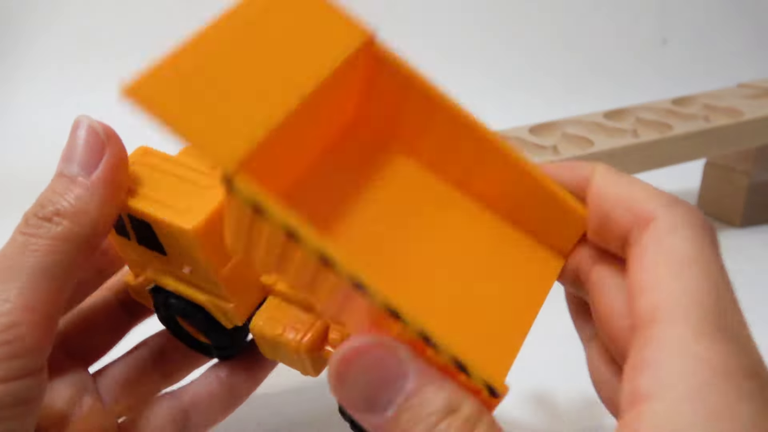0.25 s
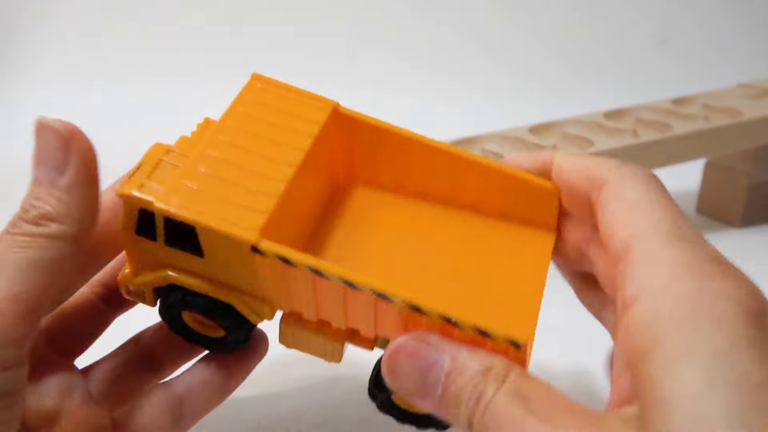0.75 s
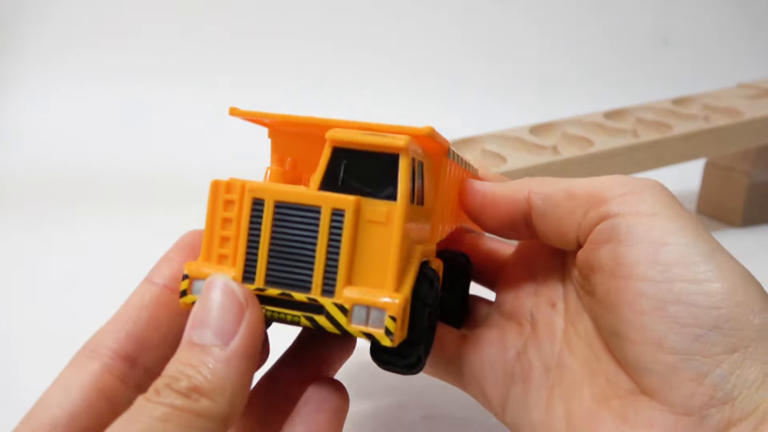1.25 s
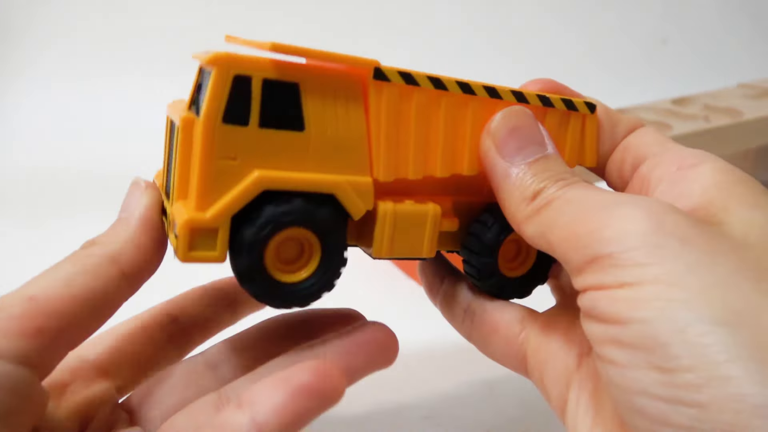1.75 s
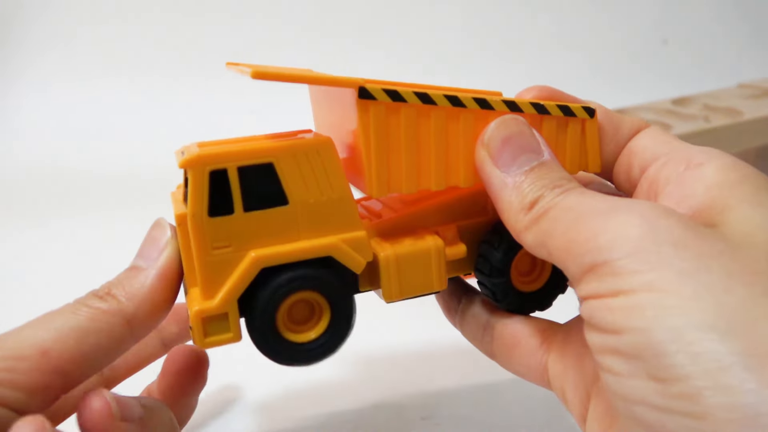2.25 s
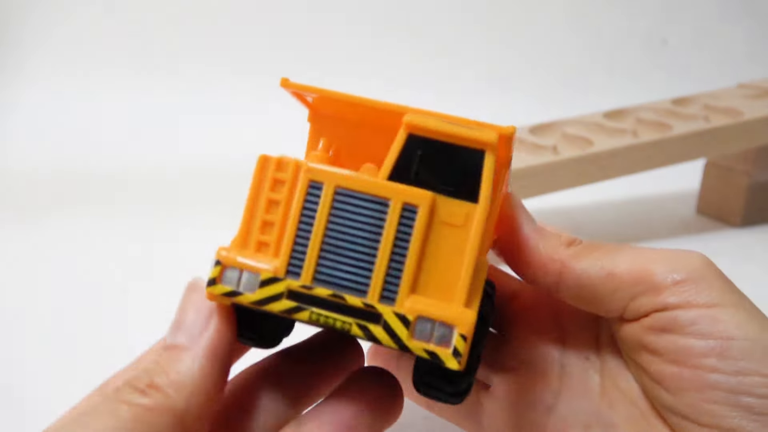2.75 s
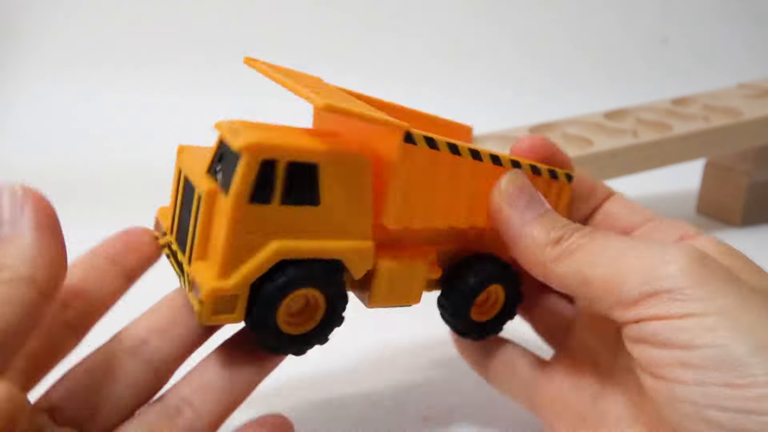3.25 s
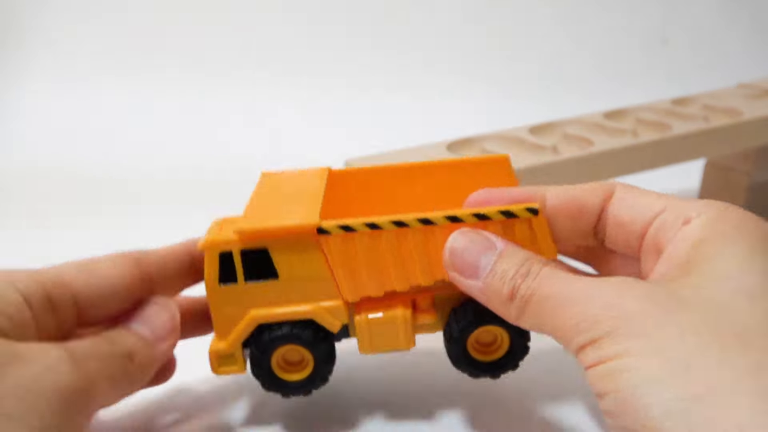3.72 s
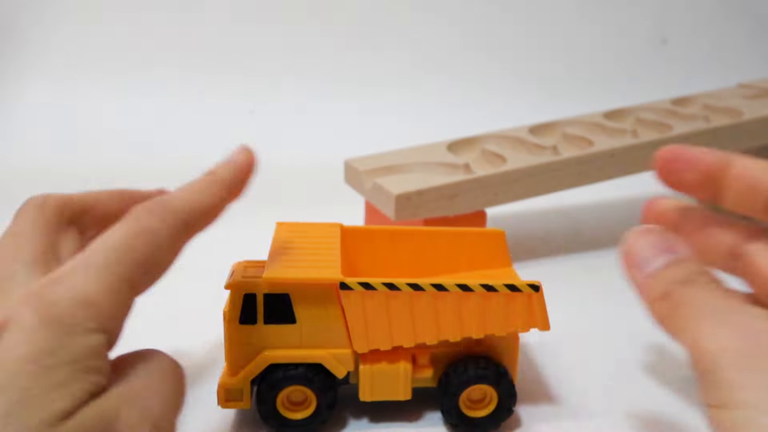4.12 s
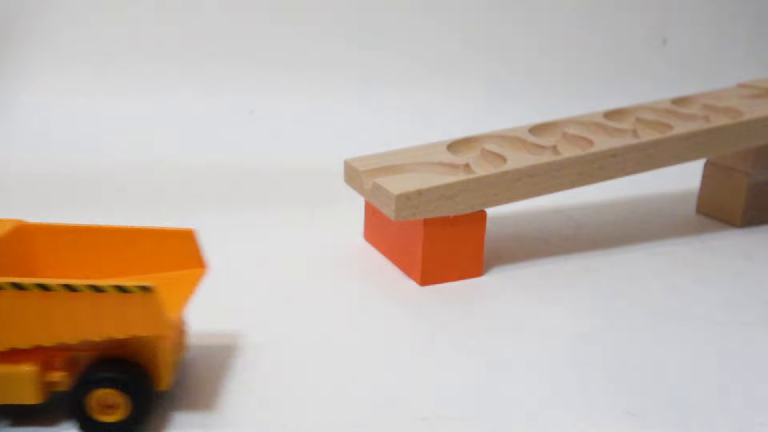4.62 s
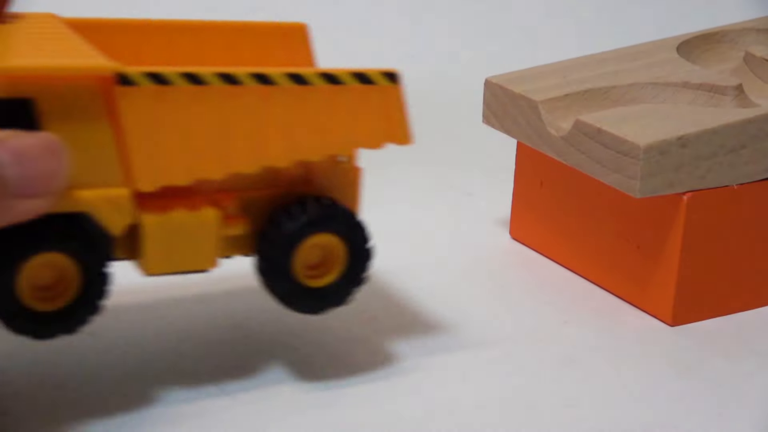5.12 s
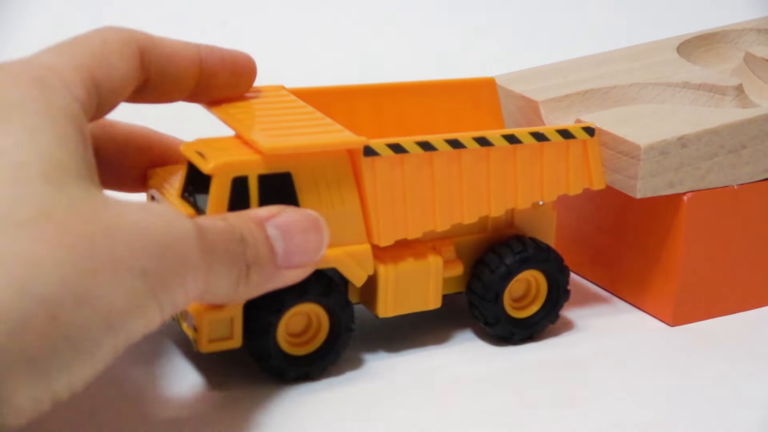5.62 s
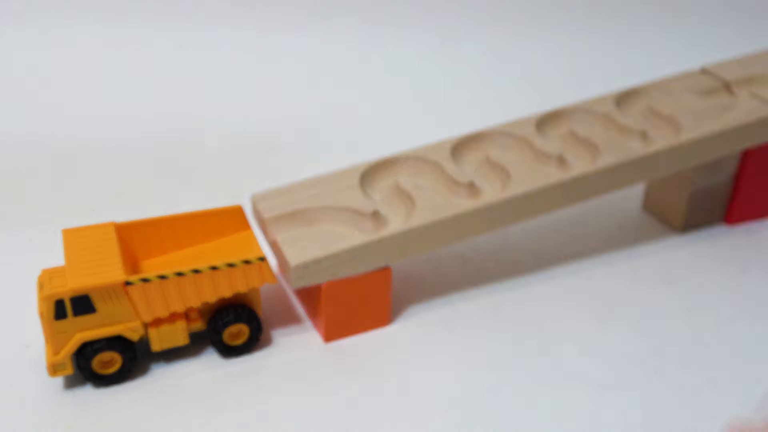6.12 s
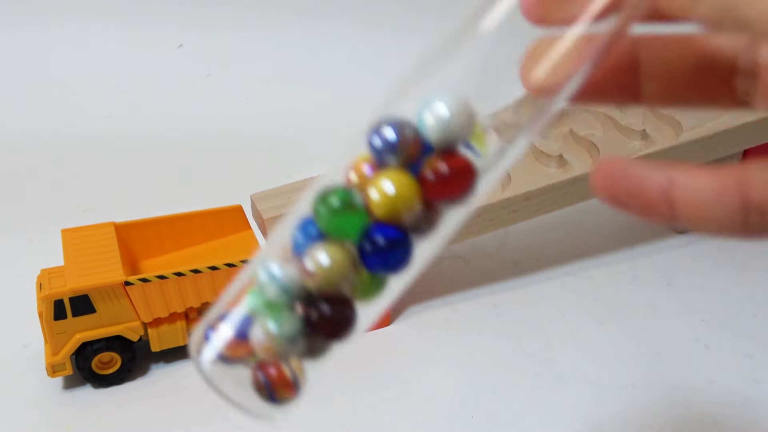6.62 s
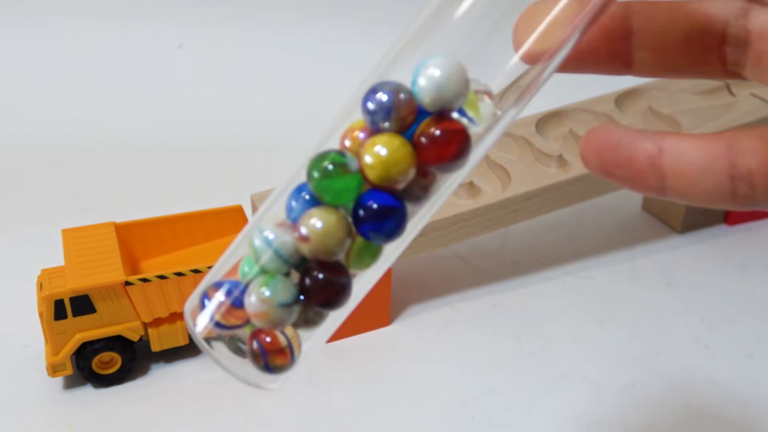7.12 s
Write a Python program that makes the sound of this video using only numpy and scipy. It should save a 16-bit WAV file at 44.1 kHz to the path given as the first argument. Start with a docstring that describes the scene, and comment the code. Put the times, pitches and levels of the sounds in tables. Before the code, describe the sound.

Close up in a small quiet room, hands handle a hollow plastic toy dump truck. Its tipping bed slams twice early amid loose clicks; a flicked wheel rattles briefly, more sharp clicks follow, then a third slam. The truck is set down with a thump, pushed with a drumming rattle, and parked with light knocks. Faint skin rubbing and low hum remain.

```python
"""A faint rub of skin, a click and a slam: hands turn over a hollow plastic toy dump truck in a small room.
Loose parts click and the tipping bed slams shut three times, each blow ringing the modes of the shell.
A flicked wheel knocks on its axle; then the truck is set down and pushed along on drumming ribbed tyres.
It is parked against a wooden ramp. Skin hisses and squeaks on top; steady air noise and a hum lie below."""
import sys
import numpy as np
from scipy import signal
from scipy.fft import rfft, irfft
from scipy.io import wavfile
from scipy.ndimage import uniform_filter1d, minimum_filter1d

SR = 44100
rng = np.random.default_rng(int(sys.argv[2]) if len(sys.argv) > 2 else 0)


def bounce(signal):
    """Save signal as a 16-bit WAV file at the path given by the first command-line argument."""
    frames = np.transpose(np.atleast_2d(signal))
    limited = np.clip(frames, -1, 1)
    pcm = np.round(limited * 32767).astype(np.int16)
    wavfile.write(sys.argv[1], SR, pcm)


N = 325017
TIME = np.arange(N) / SR
RING = TIME[:8192]  # time axis of a single blow


def amp(db):
    """Turns decibels into gain."""
    return 10 ** (np.asarray(db) / 20)


def evened(x):
    """Scales to an rms of 1."""
    return x / np.sqrt(np.mean(x ** 2) + 1e-20)


def decay(t, t60):
    """Exponential fade by 60 dB in t60 seconds."""
    return np.exp(-np.log(1000) * t / t60)


def read(points, hz):
    """Reads a curve of (Hz, value) points on a log-frequency axis."""
    f, value = np.transpose(points)
    return np.interp(np.log(hz + 1), np.log(f + 1), value)


def add(mix, s, sound):
    """Adds a sound to the mix at time s."""
    part = mix[..., max(round(s * SR), 0):][..., :sound.shape[-1]]
    part += sound[..., :part.shape[-1]]


def panned(x, left_db):
    """Spreads a sound over both channels, the left one louder by left_db."""
    return x * amp([[left_db / 2], [-left_db / 2]])


def colour(x, points, size=4096):
    """Causal minimum-phase filter with the given spectrum of (Hz, dB) points."""
    log_gain = np.log(amp(read(points, abs(np.fft.fftfreq(size, 1 / SR)))))
    taps = np.fft.ifft(np.exp(np.conj(signal.hilbert(log_gain)))).real[:size // 2]
    return signal.fftconvolve(x, taps)[:len(x)]


def wander(per_s):
    """Smooth random drift of rms 1; a higher per_s drifts faster."""
    low_pass = np.exp(-(np.fft.rfftfreq(N, 1 / SR) / per_s) ** 2)
    return evened(irfft(rfft(rng.standard_normal(N)) * low_pass, N))


def ringing(modes, weights):
    """Sum of dying modes; the weights depend on where the blow lands."""
    hz, db, t60 = np.transpose(modes)[:, :, None]
    return weights @ (amp(db) * decay(RING, t60) * np.sin(2 * np.pi * hz * RING))


def grains(per_s, spread_db):
    """Random tiny impacts, a few of them large."""
    chance = rng.random(N)
    size = np.minimum(rng.exponential(1, N), 3)
    sign = rng.choice([-1, 1], N)
    return (chance < per_s / SR) * amp(spread_db * size) * sign


# Diffuse sound in the two channels. Each row: frequency in Hz, left-right likeness from 0 to 1.
LIKENESS = [(100, 0.7), (1000, 0.89), (3000, 0.97), (7000, .6), (15000, 0.41)]


def diffuse(pair):
    """Makes two unrelated signals as alike as two close microphones hear them."""
    same = np.clip(read(LIKENESS, np.fft.rfftfreq(pair.shape[1], 1 / SR)), 0, .999)
    mid, side = rfft(pair) * np.sqrt([(1 + same) / 2, (1 - same) / 2])
    return irfft([mid + side, mid - side], pair.shape[1])


# Modes of the hollow shell. Each row: frequency in Hz, level in dB, t60 in seconds.
SHELL_MODES = [(199, 0, 0.074), (311, -10, 0.2), (1004, 0, 0.079), (1096, -8, 0.041), (1331, 4.5, 0.066),
               (1660, -11.5, 0.023), (1750, -1.5, 0.057), (2274, -8, 0.033), (2652, -3, 0.066),
               (2950, -2, 0.057), (3440, 1, 0.05), (3678, -0.5, 0.074), (3930, 7.5, 0.018),
               (4776, -7, 0.16), (5255, 7, 0.034), (7200, 5.5, 0.047)]
# Colour of a blow on the plastic. Each row: frequency in Hz, level in dB.
PLASTIC_COLOUR = [(60, -36.5), (250, -30), (500, -16.5), (750, -10), (1050, 1), (1450, 0), (2000, 2.5),
                  (2900, 3.5), (4200, -0.5), (6000, -4.5), (8500, -8.5), (12000, -18.5), (16000, -24.5)]
# Where the truck is. Each row: time in seconds, left over right in dB.
PLACE = [(3.45, -1.8), (3.96, 1), (4.3, -3.5), (4.75, 3.5), (5.1, 4.5), (5.5, 0.5)]
# Harder blows crack more briefly: a medium blow has MEDIUM_DB, and HALVING_DB above it the crack is halved
MEDIUM_DB, HALVING_DB = -30, 22


def blows(rows, crack_s, ring_db, part_db, bounce_db, bounce_s, rise_s, uneven_db=4.0, count=3, size=441):
    """Each blow chatters: a crack of crowded modes, the shell, and the brief ring of the struck part."""
    out = np.zeros((2, N))
    for s, db, body_db, treble_db, part_hz in rows:
        # first contact and its bounces
        crack_t60 = crack_s * 2 ** ((MEDIUM_DB - db) / HALVING_DB)
        delays = np.append(0, np.cumsum(bounce_s * rng.uniform(.5, 1.5, count)))
        age = np.maximum(RING - delays[:, None], 0)
        contacts = decay(age, crack_t60) * (1 - np.exp(-age / rise_s))
        contact_db = bounce_db * np.arange(len(age)) + uneven_db * np.append(0, rng.standard_normal(count))
        crack = rng.standard_normal(len(RING)) * np.sqrt(amp(contact_db) ** 2 @ contacts ** 2)

        signs = rng.choice([-1, 1], len(SHELL_MODES))
        shell = ringing(SHELL_MODES, signs * rng.uniform(0.69, 1.1, len(SHELL_MODES)))
        hit = colour(evened(crack) + amp(ring_db) * evened(shell), PLASTIC_COLOUR)
        tilt = [(250, 0), (700, body_db), (1100, body_db), (1700, 0), (3600, 0), (6000, treble_db)]
        hit = colour(hit, tilt)

        # fingers damp the struck part, so its close modes die within a few tens of milliseconds
        part_modes = [(part_hz * .87, -3, .02), (part_hz, 0, .026), (part_hz * 1.14, -3, .02)]
        part = ringing(part_modes, rng.choice([-1, 1], 3))
        part = colour(part, [(120, -16.5), (600, -2.5)])  # small parts radiate little bass

        # hit and part are balanced over their first samples
        hit = amp(db) * (hit / np.std(hit[:size]) + amp(part_db) * part / np.std(part[:size]))
        add(out, s, panned(hit, np.interp(s, *np.transpose(PLACE))))
    return out


def faint_ticks(rows, lead_s=0.01, softer_db=-23, duller_db=-9):
    """A faint, dull tick comes about 10 ms before each hard blow."""
    leads = lead_s * rng.uniform(.6, 1.4, len(rows))
    return [(s - lead, db + softer_db, body_db, treble_db + duller_db, hz)
            for (s, db, body_db, treble_db, hz), lead in zip(rows, leads) if db > MEDIUM_DB]


# The tipping bed drops on the chassis. Each row: start in seconds, level in dB,
# extra body in dB, extra treble in dB, pitch of the struck part in Hz.
SLAMS = [(0.1017, -7.5, -3.5, -1, 1207), (0.7201, -6.5, -4.5, 0.21, 1750), (3.4183, -9, 3, 0.5, 2650)]


def bed_slams():
    """The bed hits with a steep onset and chatters on the chassis nine more times."""
    return blows(SLAMS, crack_s=0.029, ring_db=-7.5, part_db=-9.5,
                 bounce_db=-3.0, bounce_s=0.0051, rise_s=.00028, count=9)


# A loose part clicks against its stop while the truck is turned. Each row: start in seconds, level in dB,
# extra body in dB, extra treble in dB, pitch of the part in Hz.
CLICKS = [(0.0429, -37, 12.5, -9.5, 1100), (0.303, -34.5, 6, 5, 2100), (0.3863, -37.5, 13, 3, 1800),
          (0.4126, -29.5, 12, -1, 970), (0.4194, -26.5, 11, -22, 1320), (0.5247, -22.5, -16, 1, 3000),
          (0.5686, -23, 4, 2, 1670), (0.687, -30.5, 4, -1.5, 1720), (0.7135, -31, -3, -13, 1750),
          (0.828, -35.5, 9.5, -1.5, 1670), (0.9305, -22, 2.5, -3.5, 1840), (0.9765, -25, 9.5, -1.5, 1010),
          (1.032, -40.5, -2, -7, 1760), (1.0559, -34, 6.5, -10, 1350), (1.0753, -41.5, 12, -16, 980),
          (1.1488, -30.5, 14.5, -3, 1004), (1.1901, -41.5, 15, -6, 1000), (1.5378, -42, 11.5, -9.5, 2390),
          (1.5928, -39.5, 16, -4.5, 1075), (1.6049, -37.5, 8, -2, 2640), (1.6256, -16.5, 4.5, -3, 3004),
          (1.6417, -30.5, -4, -9, 2980), (1.724, -20, 5.5, -1, 1270), (1.925, -28, 6.5, 3, 1300),
          (1.9649, -28.5, 14.5, 4.5, 960), (2.0617, -23, -13, -16, 967), (2.0651, -20, 4, 11.5, 1016),
          (2.0849, -39, 3, 7, 930), (2.1938, -27.5, -12, -5, 970), (2.4947, -22.5, 1.5, 10, 3630),
          (2.5002, -22.5, 10.5, 2, 1004), (2.5512, -14.5, 9.5, 10, 2975), (2.6105, -17, 3, 0, 3030),
          (2.8574, -43.5, 15.5, -1, 1300), (3.2596, -27.5, 6, 8, 1003), (3.3366, -45.5, 10.5, 0, 3160),
          (3.3775, -44.5, 19, -1, 2660), (3.3895, -36.5, 6, 1.5, 2800), (3.6505, -47, 11, -8, 1292),
          (3.6767, -44, 18.5, -14, 976)]


def part_clicks():
    """Loose parts hit their stops and bounce once; faint ticks come before the hard clicks and the slams."""
    rows = CLICKS + faint_ticks(CLICKS) + faint_ticks(SLAMS, softer_db=-28.5)
    return blows(rows, crack_s=.017, ring_db=-11.5, part_db=-5,
                 bounce_db=-11, bounce_s=0.0039, rise_s=0.0026, count=1)


# Wheels and chassis hit the table or the ramp. Each row: start in seconds, level in dB,
# extra body in dB, extra treble in dB, pitch of the struck part in Hz.
JOLTS = [(3.9632, -18.5, -2, -3, 1570), (3.9684, -20, 8.5, -8.5, 1570), (4.0388, -26.5, 9, -3, 1970),
         (4.058, -33.5, 10, -11, 1520), (4.093, -39, 20.5, 2, 1250), (4.3394, -39, 14, 1, 1740),
         (4.3688, -40, -13, -15, 1090), (4.4855, -38.5, 1, -15, 1200), (4.5376, -36, 12, -20, 2340),
         (4.5487, -29, 14, -23, 2310), (4.6287, -30.5, 3, -8, 1040), (4.723, -30.5, -6, -11, 2080),
         (4.7533, -25, -10, -4.5, 1220), (4.783, -33, -11, 2, 1980), (4.8931, -28, 9, -4, 2050),
         (4.8981, -28.5, -14, 2.5, 1920), (5.0834, -43.5, 5, -7, 990), (5.4575, -40.5, -3, -7, 960),
         (5.4634, -32.5, 4, -9, 1000), (5.4887, -35.5, 8, -15, 1200), (5.548, -39, 3, -10, 970),
         (5.5774, -40, 9, -6, 950), (5.5889, -27, 16, -2.5, 1990), (5.639, -25.5, 7.5, -1, 1650),
         (5.7192, -46, 14, 5, 1740), (5.7894, -38, 12.5, 3, 1510), (5.8056, -37.5, 17, 1, 1440),
         (5.8822, -48, 3.5, -24, 2740)]


def truck_jolts():
    """The whole truck rattles with two wider-spaced bounces."""
    return blows(JOLTS, crack_s=0.032, ring_db=-14, part_db=-3.5,
                 bounce_db=-12, bounce_s=0.011, rise_s=0.0015, count=2)


# The flicked wheel, until it is caught. Each row: time in seconds, level in dB.
SPIN = [(2.075, -31.5), (2.21, -28.5), (2.25, -33), (2.489, -34)]
# Modes of the axle. Each row: frequency in Hz, level in dB, t60 in seconds; pitches vary by contact point.
AXLE_MODES = [(666, -13, 0.038), (1010, 0.5, 0.037), (1203, 0.5, 0.017), (1830, -4.5, 0.0085),
              (2760, 2.5, 0.021), (3570, 2.5, 0.01244), (5100, -17.5, .008), (7200, -14.5, 0.012)]
# The wheel runs out of true and knocks harder once a turn; the turn rate is that of the start
START_TURNS_PER_S, WOBBLE_DB = 20, 2


def wheel(start_per_s=125, end_per_s=78, scrape_db=-9, crack_db=-9, detune=.07, count=7):
    """The loose wheel knocks on its axle as it slows; every contact point rings a little differently."""
    s, db = np.transpose(SPIN)
    speed = np.interp(TIME, [s[0], s[-1]], [start_per_s, end_per_s])  # mean knocks per second
    turns = START_TURNS_PER_S * np.cumsum(speed / start_per_s * (TIME > s[0])) / SR
    rate = speed * (1 + .45 * wander(90))
    knocks = np.diff(np.floor(np.cumsum(rate) / SR), prepend=0) * amp(2.8 * rng.standard_normal(N))
    drive = evened(knocks) + amp(scrape_db) * evened(grains(1660, 2.5))
    drive = drive * amp(WOBBLE_DB * np.cos(2 * np.pi * turns))

    place, sound = rng.integers(0, count, N), np.zeros(N)
    for k in range(count):
        modes = np.array(AXLE_MODES) * (1 + [detune, 0, 0] * rng.standard_normal((len(AXLE_MODES), 3)))
        crack = colour(rng.standard_normal(len(RING)) * np.exp(-RING / 0.00092), PLASTIC_COLOUR)
        ring = ringing(modes, rng.uniform(0.33, 1.8, len(AXLE_MODES)))
        contact = (evened(ring) + amp(crack_db) * evened(crack)) * (1 - np.exp(-RING / 0.0013))
        sound += signal.oaconvolve(drive * (place == k), contact)[:N]
    sound = colour(sound, [(100, -31.0), (300, -13.5), (650, -12.0)])  # a small wheel radiates little bass
    spinning = (TIME > s[0]) * (TIME < s[-1])
    return panned(spinning * evened(sound) * amp(np.interp(TIME, s, db)), -0.23)


# The push along the table. Each row: time in seconds, thrum of the tyres in dB,
# rattle of the body in dB before the shake_db trim.
PUSH = [(4.4, -56, -52), (4.528, -40, -40.5), (4.538, -42, -34.5), (4.686, -32, -29), (4.75, -32, -25),
        (4.886, -32, -31), (4.894, -25, -29.5), (4.934, -39, -24)]
# The tread drums faster as the truck gains speed. Each row: time in seconds, mean ribs per second.
RIBS = [(4.4, 122), (4.67, 121), (4.73, 147), (4.93, 150)]
# Colour of the rattle while rolling. Each row: frequency in Hz, level in dB.
ROLLING_COLOUR = [(120, -6), (300, -1.5), (500, 4.5), (750, 2.5), (1200, 9.5), (1600, -2), (2100, 8.5),
                  (3000, -5.5), (3800, 4), (4700, -9.5), (8000, -13.5), (12000, -39), (16000, -60)]


def rolling(throb=0.1, rumble_db=-5, ticks_db=6, shake_db=-2):
    """Tread ribs drum on the table and shake the loose body into ticks over a fine rattle."""
    s, *columns = np.transpose(PUSH)
    thrum_db, rattle_db = (np.interp(TIME, s, c) for c in columns)
    ribs_hz = np.interp(TIME, *np.transpose(RIBS))
    tread = np.sin(2 * np.pi * np.cumsum(ribs_hz * (1 + 0.062 * wander(56))) / SR)
    rumble = colour(rng.standard_normal(N), [(30, -30), (80, -1.5), (130, 3.5), (220, -10.5),
                                             (310, -5.5), (450, -29.5), (1500, -41.5)])
    thrum = tread * (1 + 0.15 * wander(25)) + amp(rumble_db) * evened(rumble)
    thrum = evened(thrum) * amp(thrum_db)

    ticks = np.zeros(N)
    for _ in range(4):  # four tick sounds
        tick = rng.standard_normal(len(RING)) * np.exp(-RING / .0012)
        ticks += signal.oaconvolve(grains(50, 2.8), tick)[:N]
    shaking = (evened(grains(1500, 1.6)) + amp(ticks_db) * evened(ticks)) * (1 + throb * tread)
    rattle = evened(colour(shaking, ROLLING_COLOUR)) * amp(rattle_db + shake_db)
    moving = uniform_filter1d(1. * (TIME > s[0]) * (TIME < s[-1]), size=128)
    return moving * (panned(thrum, 2.6) + panned(rattle, 1.2))


# Dull bumps on the truck or the table. Each row: start in seconds, level in dB, pitch in Hz, t60 in seconds.
BUMPS = [(0.103, -44, 199.5, 0.11), (0.721, -35.5, 212.5, 0.1), (1.375, -46.5, 256, 0.033),
         (2.761, -36.5, 188, 0.015), (3.968, -23.5, 115, 0.14), (3.966, -29, 309.4, .14),
         (4.211, -33, 710, 0.012), (4.335, -37.5, 122.5, 0.22), (5.638, -42, 303, 0.26),
         (5.809, -47, 129, 0.066)]


def bumps(blur_db=-2):
    """Soft, low pushes: a dying sine blurred by the many modes of the table."""
    out = np.zeros(N)
    for s, db, hz, t60 in BUMPS:
        blur = colour(rng.standard_normal(len(RING)),
                      [(hz / 4, -24), (hz * .6, -2), (hz * 1.4, -3), (hz * 4, -35), (hz * 10, -70)])
        body = evened(evened(np.sin(2 * np.pi * hz * RING)) + amp(blur_db) * evened(blur))
        add(out, s, amp(db) * body * decay(RING, t60) * (1 - np.exp(-RING / 0.0004)))
    return panned(out, 2.5)


# Skin slides over plastic or table. Each row: start in seconds, length in seconds, level in dB,
# extra treble in dB.
STROKES = [(0, 0.076, -45.5, -28), (0.264, .12, -50, -6), (0.83, .39, -48, -3.5), (1.21, 0.26, -59, -9),
           (2.04, 0.024, -50, 0), (2.762, 0.061, -56, 5), (3.203, 0.15, -51, -8), (3.67, 0.1, -52, 6),
           (3.844, .06, -57, -4), (3.947, .02, -32.5, -4), (4.95, 0.075, -57, 7.5), (4.999, .15, -50.5, 4),
           (5.166, 0.292, -52.5, -2), (5.522, 0.29, -58, -19), (5.653, 0.027, -43, -22),
           (5.827, 0.14, -53.5, -5.5), (5.974, 0.07, -55.5, 4.5), (6.199, 0.016, -55.5, 10)]
# Colour of sliding skin. Each row: frequency in Hz, level in dB.
SKIN_COLOUR = [(200, -8.5), (600, -2), (1000, 4.5), (1900, -2.5), (3100, -1), (5000, -2), (8000, -5),
               (12000, -10), (16000, -20)]


def rubbing(grain_db=-5, rise_s=0.013, fade_db_per_s=236.5):
    """Skin slides with a fine, grainy hiss; each stroke swells, holds and dies away."""
    sides = []
    for _ in range(2):
        grainy = rng.standard_normal(N) + amp(grain_db) * evened(grains(900, 3.1))
        sides.append(colour(grainy, SKIN_COLOUR))
    hiss = evened(diffuse(np.array(sides)))
    treble = signal.sosfilt(signal.butter(1, 4000, "high", fs=SR, output="sos"), hiss)
    out = np.zeros((2, N))
    for s, length, db, treble_db in STROKES:
        swell = np.clip((TIME - s) / rise_s, 0, 1)
        level = swell * amp(db - fade_db_per_s * np.clip(TIME - s - length, 0, 1))
        # each stroke plays another stretch of the hiss
        out += level * np.roll(hiss + (amp(treble_db) - 1) * treble, rng.integers(N), axis=1)
    return out * amp(1.57 * wander(35))


# A fingertip sticks and slips on the plastic. Each row: start in seconds, length in seconds,
# mean pitch in Hz, level in dB.
SQUEAKS = [(0.285, 0.062, 2050, -45), (1.282, 0.08, 3800, -59.5), (3.708, .1, 3020, -52.5),
           (3.708, 0.053, 3600, -52), (3.719, 0.1, 4930, -57), (3.733, 0.068, 6600, -56),
           (4.318, 0.051, 1734, -47.5)]


def squeaks(waver=0.021):
    """Stick-slip gives short, rough tones of unsteady pitch."""
    out, drift, grip = np.zeros(N), wander(180), amp(4.0 * wander(250))
    for s, length, hz, db in SQUEAKS:
        span = slice(round(s * SR), round((s + length) * SR))
        tone = np.sin(2 * np.pi * np.cumsum(hz * (1 + waver * drift[span])) / SR) * grip[span]
        add(out, s, amp(db) * evened(tone * np.hanning(len(tone))))
    return out


# How the small room dies away. Each row: frequency in Hz, t60 in seconds.
ROOM_T60 = [(150, 0.37), (700, 0.25), (1700, 0.24), (4500, 0.25), (9000, 0.25), (16000, 0.21)]


def room(x, size=20000):
    """Dense reflections that start within a few milliseconds; each band dies at its own speed."""
    hz, t, z = signal.stft(diffuse(rng.standard_normal((2, size))), SR, nperseg=256)
    fading = z * decay(t, read(ROOM_T60, hz)[:, None])
    tail = signal.istft(fading, SR, nperseg=256)[1][:, :size]
    tail = tail * np.clip((TIME[:size] - .003) / 0.0041, 0, 1)
    return signal.oaconvolve(x, tail / np.linalg.norm(tail[0]), axes=1)[:, :N]


# Colour of the quiet air. Each row: frequency in Hz, level in dB.
AIR_COLOUR = [(20, 13.5), (60, 10), (100, 6), (180, 1.5), (300, -3.5), (550, 2), (750, 0.5), (1100, 4.5),
              (1400, 1.5), (1800, -12.5), (4000, -13.5), (16000, -15)]


def room_tone(air_db=-59.5, hum_hz=64, hum_db=-62.5):
    """Faint steady air noise over a low hum of wavering pitch and strength."""
    air = diffuse(np.array([colour(rng.standard_normal(N), AIR_COLOUR) for _ in range(2)]))
    hum = np.sin(2 * np.pi * np.cumsum(hum_hz + 1.5 * wander(6)) / SR) * (1 + 0.22 * wander(5.5))
    return amp(air_db) * evened(air) + amp(hum_db) * evened(hum)


def scene(dip_s=4.937):
    """The truck near by, the room answering it, the skin and the quiet air."""
    slams, clicks, jolts = bed_slams(), part_clicks(), truck_jolts()
    spin, push, thuds = wheel(), rolling(), bumps()
    direct = slams + clicks + jolts + spin + push + thuds
    to_room = amp(-9) * slams + amp(-10) * clicks + amp(-8.5) * jolts
    to_room += amp(-9.0) * spin + amp(-9.5) * push + amp(-11.5) * thuds
    # the truck and its echo dip to a fifth for a moment at 4.94 s
    hush = 1 - uniform_filter1d(0.8 * (TIME > dip_s) * (TIME < dip_s + .13), size=128)
    return (direct + room(to_room)) * hush + rubbing() + squeaks() + room_tone()


def record(dry, ceiling=.5, release_db_per_s=700, edge_hz=16100):
    """A fast limiter flattens the loudest cracks, so rattle and room tails stand out; then the band limit."""
    over_db = np.maximum(20 * np.log10(abs(dry).max(0) + 1e-9) - 20 * np.log10(ceiling), 0)
    fall = TIME * release_db_per_s
    held_db = np.maximum.accumulate(over_db + fall) - fall
    duck_db = uniform_filter1d(minimum_filter1d(-held_db, size=17), size=33)
    high_pass = signal.butter(2, 45, "high", fs=SR, output="sos")  # small microphones lack deep bass
    thinned = signal.sosfilt(high_pass, dry * amp(duck_db))
    low_pass = signal.firwin(255, edge_hz, window=("kaiser", 9), fs=SR)
    return signal.oaconvolve(thinned, low_pass[None], "same")


dry = scene()
out = record(dry)
bounce(out)
```